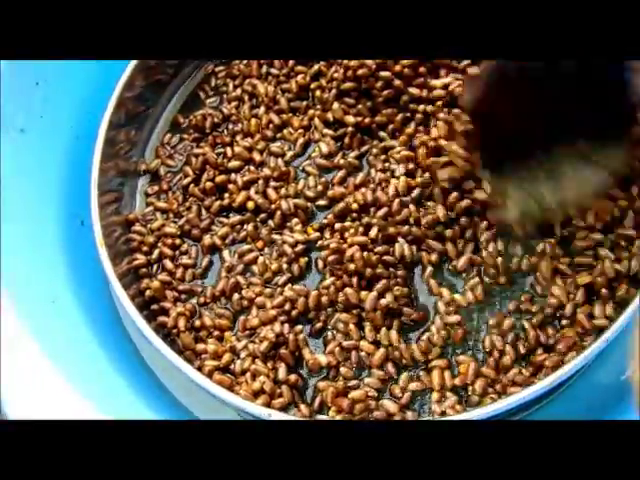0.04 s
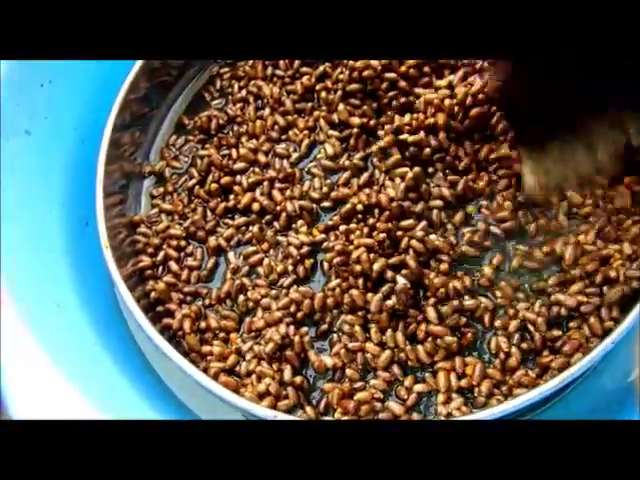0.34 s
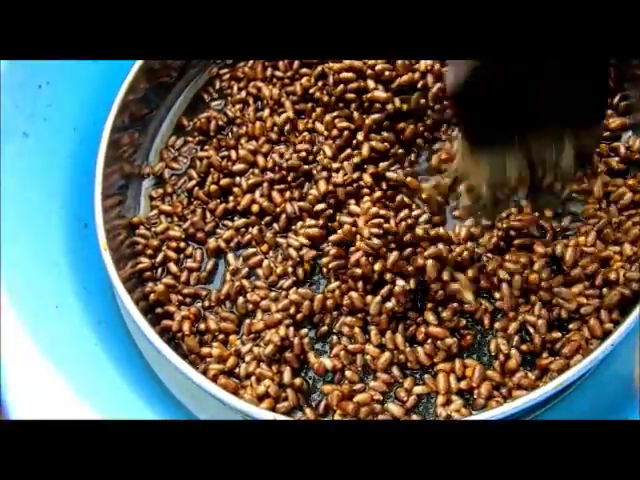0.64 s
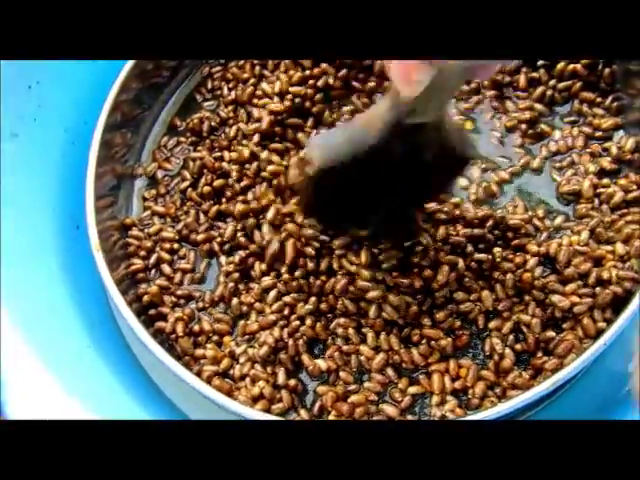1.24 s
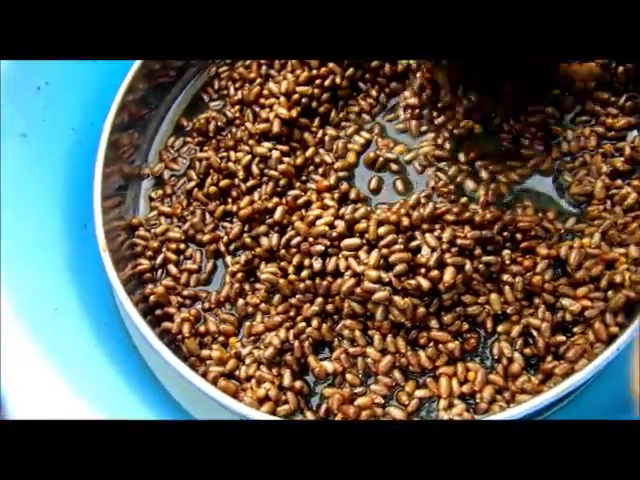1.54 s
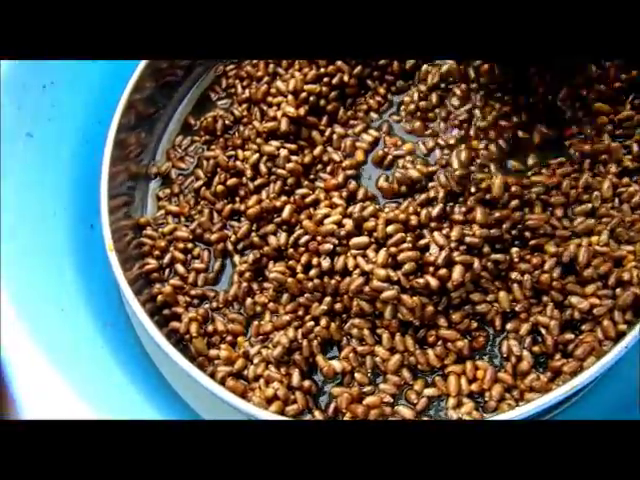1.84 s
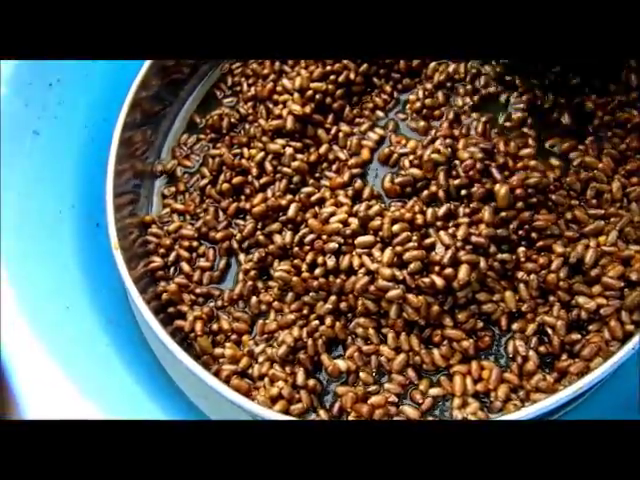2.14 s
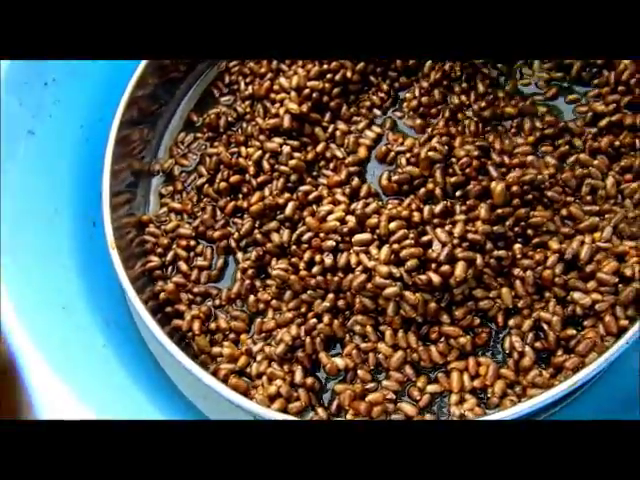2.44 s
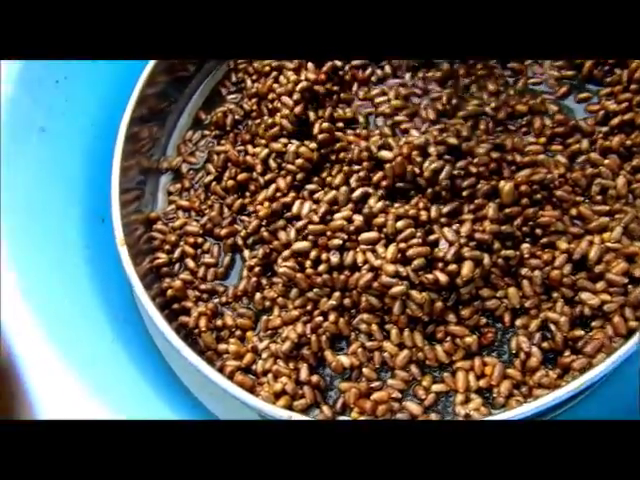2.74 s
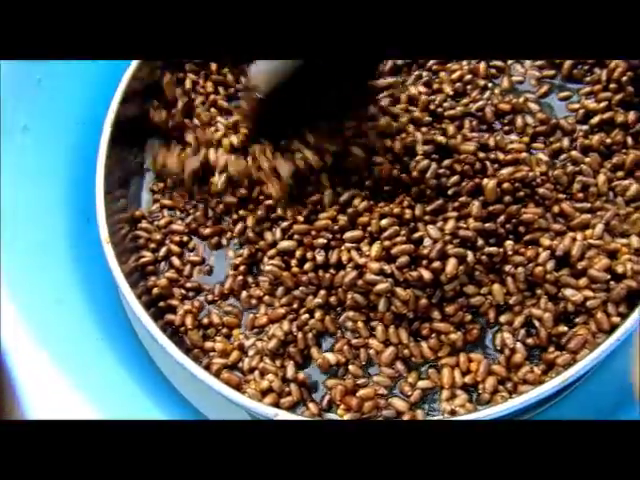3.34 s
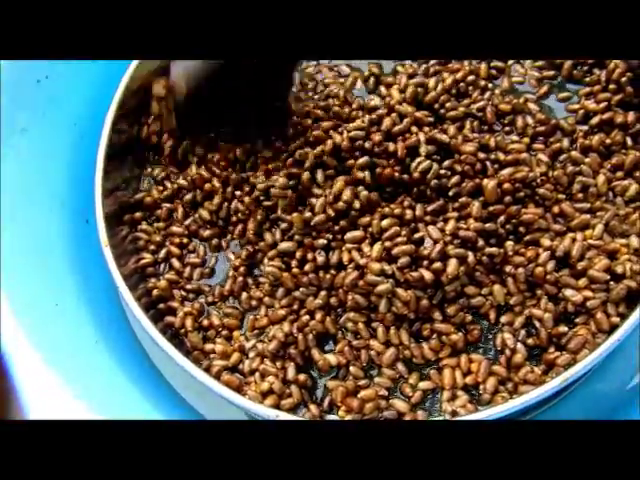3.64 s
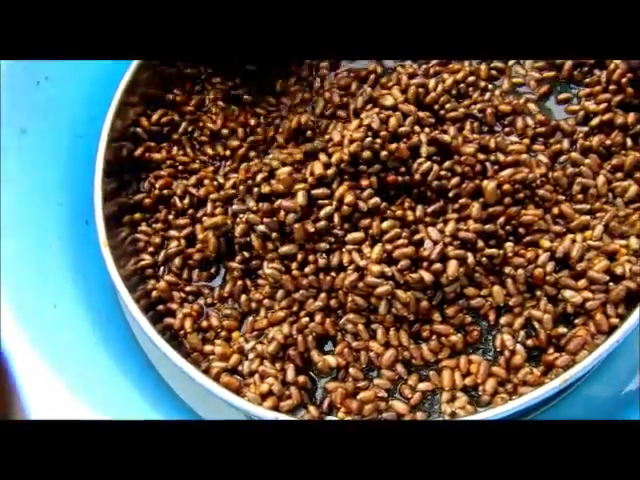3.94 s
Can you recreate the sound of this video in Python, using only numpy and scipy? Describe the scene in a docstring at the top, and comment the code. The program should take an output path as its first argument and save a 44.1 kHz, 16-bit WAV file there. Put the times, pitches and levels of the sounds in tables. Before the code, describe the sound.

Water swishes in uneven strokes as a paddle stirs light, crackling cocoons, close up.

```python
"""A paddle stirs small cocoons floating in a sieve of water, indoors, close to the microphone.
From the start, each stroke crowds wet contacts into a swish, frees little bubbles and makes the shells
crackle; air pockets plop and a few shells snap. Between strokes the water sloshes dully. Just past
two seconds comes a faint squeak, near three the basin is bumped, and the stirring goes on to the end.
Throughout, the resonances of the microphone's housing colour the sound."""
import sys
import numpy as np
from scipy import signal
from scipy.fft import rfft, irfft
from scipy.io import wavfile
from scipy.ndimage import uniform_filter1d

SR = 44100
rng = np.random.default_rng(int(sys.argv[2]) if len(sys.argv) > 2 else 0)


def master_out(mix):
    """Clip the mix to full scale and print it as 16-bit PCM to the path in sys.argv[1]."""
    frames = np.transpose(np.atleast_2d(mix))
    ceiling = np.clip(frames, -1, 1)
    pcm = np.round(ceiling * 32767).astype(np.int16)
    wavfile.write(sys.argv[1], SR, pcm)


N = 176400

BUBBLE_CUT_HZ, BUBBLE_HIGH_HZ = 410, 3010  # bubbles radiate no deep bass; pitch of the smallest
SNAP_DECAY_S = 0.00072


def undb(db):
    """Decibels as an amplitude ratio."""
    return 10 ** (np.asarray(db) / 20)


def unit(x):
    """Normalisation to rms 1."""
    return x / np.sqrt(np.mean(x ** 2))


def add(out, start_s, sound):
    """Superposition: a short sound adds to what is already there."""
    i = max(int(start_s * SR), 0)
    part = out[i:i + len(sound)]
    part += sound[:len(part)]


def cut(x, hz, kind, order):
    """High-pass or low-pass filtering, 6 dB per octave for each order."""
    return signal.sosfilt(signal.butter(order, hz, kind, fs=SR, output="sos"), x)


def colour(x, points):
    """Minimum-phase filtering through (frequency_hz, level_db) points; rms 1."""
    hz, db = np.array(points, float).T
    bins_hz = np.maximum(np.fft.rfftfreq(N, 1 / SR), 1)
    gain = undb(np.interp(np.log(bins_hz), np.log(hz), db))
    cepstrum = irfft(np.log(gain), N)
    cepstrum[1:N // 2] *= 2  # folding onto positive time makes the filter causal
    cepstrum[N // 2 + 1:] = 0
    return unit(irfft(rfft(x) * np.exp(rfft(cepstrum)), N))


def walk(rate_hz):
    """Random modulation: noise smoothed over 1 / rate_hz seconds; rms 1."""
    span = max(int(SR / rate_hz), 1)
    return unit(uniform_filter1d(uniform_filter1d(rng.standard_normal(N), span), span))


def contacts(per_s, scatter_db):
    """Shot noise: independent tiny impacts of uneven strength."""
    hit = rng.random(N) < per_s / SR
    polarity = np.sign(rng.standard_normal(N))
    return hit * polarity * undb(scatter_db * np.clip(rng.standard_normal(N), -2, 2))


def ring(hz, decay_s, attack_s, glide=0):
    """Damped oscillation; the pitch rises by the fraction glide in each decay time."""
    t = np.arange(int(10 * decay_s * SR) + 2) / SR
    phase = 2 * np.pi * hz * t * (1 + glide * t / decay_s / 2)
    return np.sin(phase) * np.exp(-t / decay_s) * (1 - np.exp(-t / attack_s))


def crack(top_hz):
    """A broadband transient: low-passed noise that quickly builds and fades."""
    age = np.arange(SR // 20) / SR / SNAP_DECAY_S
    return cut(rng.standard_normal(len(age)) * age * np.exp(-age), top_hz, "low", order=2)


def grains(per_s, low_hz, high_hz, decay_cycles, scatter_db, glide=0):
    """Incoherent sum of short rings of random pitch and strength; rms 1."""
    out, chance, pitch = np.zeros(N), rng.random(N), rng.random(N)
    strength = undb(scatter_db * np.clip(rng.standard_normal(N), -2, 2))
    for i in np.flatnonzero(chance < per_s / SR):
        hz = low_hz * (high_hz / low_hz) ** pitch[i]
        add(out, i / SR, strength[i] * ring(hz, decay_cycles / hz, 1 / hz, glide))
    return unit(cut(out, BUBBLE_CUT_HZ, "high", order=2))


def hiss():
    """The noise floor: faint, stationary coloured noise."""
    # spectral density of the hiss: frequency_hz, relative_db
    spectrum = [(30, -3), (200, 10), (1500, -3), (5000, -32), (10000, -7.5), (14500, -2.5), (16000, -15)]
    return undb(-65) * colour(rng.standard_normal(N), spectrum)


def room(direct, t60_s):
    """Reverberation: dense reflections decay exponentially, by 60 dB in t60_s."""
    t = np.arange(SR // 2) / SR
    tail = rng.standard_normal(len(t)) * np.exp(-np.log(1000) * t / t60_s)
    return signal.fftconvolve(direct, tail / np.linalg.norm(tail))[:N]


def high_hiss(slosh):
    """Amplitude-modulated noise: a faint high hiss that rises and falls with the sloshing."""
    return slosh * undb(-25.5) * cut(rng.standard_normal(N), 6500, "high", order=1)


def squeak():
    """A falling glide: one thin tone, perhaps of squeezed air, swells and fades."""
    # the whistle: start_s, length_s, first_hz, last_hz, level_db
    whistle = (2.16, .034, 2950, 2450, -52)
    start_s, length_s, first_hz, last_hz, level_db = whistle
    out, hz = np.zeros(N), np.linspace(first_hz, last_hz, int(length_s * SR))
    tone = np.sin(2 * np.pi * np.cumsum(hz) / SR)
    add(out, start_s, undb(level_db) * tone * np.sqrt(np.hanning(len(hz))))
    return out


def bump(start_s):
    """Modal vibration: a soft knock rings the low modes of the full basin."""
    # modes of the basin: pitch_hz, level_db, decay_ms
    modes = [(238, 2.5, 1.6), (337, -11.5, 10.3), (363, -15.5, 6.8), (550, -4, 0.72)]
    out = np.zeros(N)
    for pitch_hz, level_db, decay_ms in modes:
        add(out, start_s, -undb(level_db) * ring(pitch_hz, decay_ms / 1000, attack_s=.0013))
    return out


def snaps():
    """Impulse response of single shells and droplets: a crack and a tiny ring."""
    # snaps near the microphone: start_s, pitch_hz, ring_db, crack_db
    impacts = [(.031, 2420, -16.5, -21), (0.0817, 7850, -20.5, -39), (0.0994, 2740, -18, -25),
               (0.1616, 4600, -25, -22), (0.175, 4550, -27, -16), (0.1933, 6400, -19, -31),
               (0.2396, 2710, -17, -19), (.44, 4500, -26, -29), (0.5088, 4250, -26, -33),
               (.544, 4560, -26, -15.5), (0.6002, 4730, -22, -27), (0.659, 7400, -28, -25),
               (0.6876, 4380, -23.5, -38), (.9175, 2600, -4.5, -21), (0.9349, 6340, -31, -18.5),
               (1.113, 4540, -23.5, -34.5), (1.705, 14600, -16, -18), (1.7055, 4850, -14, -31),
               (1.7303, 7900, -17, -14.5), (1.895, 4530, -39, -29), (2.029, 4600, -20, -16.5),
               (2.075, 2300, -6.5, -20), (2.1614, 6200, -29.5, -36), (2.363, 7900, -35, -31),
               (2.6148, 4280, -20, -28), (2.717, 6370, -34, -14), (2.7785, 6250, -35, -19.5),
               (3.03, 2770, -8.5, -23), (3.048, 7800, -23, -16.5), (3.0601, 4500, -27, -22.5),
               (3.131, 6170, -30, -28), (3.169, 6100, -28, -41), (3.425, 3500, -15, -34),
               (3.5465, 4610, -18.5, -33)]
    out = np.zeros(N)
    for start_s, pitch_hz, ring_db, crack_db in impacts:
        add(out, start_s, undb(ring_db) * ring(pitch_hz, SNAP_DECAY_S, attack_s=2 / pitch_hz))
        add(out, start_s, undb(crack_db) * crack(top_hz=10000))
    return out


def plops():
    """Cavity resonance: an air pocket's film bursts with a click and the air rings a hollow note."""
    # larger air pockets: start_s, pitch_hz, level_db, decay_ms
    pockets = [(.045, 766, -22.5, 5.1), (0.2474, 846, -8.5, 1.8), (0.2506, 1069, -13.5, 6.6),
               (.5701, 766, -3, 1.07), (.814, 996, -20.5, 3.7), (.8828, 670, -9, 1), (.8885, 930, -9, 0.9),
               (1.3035, 660, -23, 3.1), (1.433, 720, -25.5, 4.5), (1.5265, 960, -22.5, 1.7),
               (1.946, 685, -24, 2.1), (2.137, 964, -26.5, 3.5), (2.205, 705, -24.5, 1.4),
               (2.377, 750, -16.5, 1.2), (2.882, 680, -26, 1.3), (2.9222, 825, -10, 1.55),
               (3.245, 900, -20, 1.8), (3.547, 576, -24.5, 2.5), (3.641, 665, -19.5, 2.5),
               (3.924, 1000, -23.5, 2.9)]
    out = np.zeros(N)
    for start_s, pitch_hz, level_db, decay_ms in pockets:
        film = undb(level_db - 21) * crack(BUBBLE_HIGH_HZ)
        note = -undb(level_db) * ring(pitch_hz, decay_ms / 1000, attack_s=0.00033, glide=0.0074)
        add(out, start_s, film)
        add(out, start_s, note)
    return cut(out, BUBBLE_CUT_HZ, "high", order=3)


def shells():
    """Stick-slip friction: cocoons catch and slip, rub in little clumps and tick against each other."""
    # spectral density of the rubbing: frequency_hz, relative_db
    spectrum = [(300, -15), (1500, 7), (2700, 11.5), (3600, -11), (4600, 8), (6000, 5), (9000, 1.5),
                (12000, -11.5), (16000, -12)]
    clumps = undb(5 * np.clip(walk(rate_hz=310), -2, 2))
    rustle = colour(contacts(per_s=5500, scatter_db=4.5) * clumps, spectrum)
    ticks = grains(per_s=450, low_hz=1890, high_hz=10500, decay_cycles=1.5, scatter_db=7)
    catching = unit(undb(3 * walk(rate_hz=66)))
    return (undb(0.5) * rustle + ticks) * catching


def water():
    """Wet contacts merge into gurgling shot noise, in which small bubbles ring at resonance."""
    # spectral density of the swish: frequency_hz, relative_db
    spectrum = [(40, -15), (110, -34.5), (190, -20), (290, -2.5), (550, 1.5), (850, -1), (1500, 2.5),
                (2100, -8), (2900, -6.5), (3600, -18), (4600, -17.5), (6000, -25), (10000, -30),
                (16000, -42)]
    wet_contacts = contacts(per_s=9000, scatter_db=3)
    gurgle = undb(1.8 * walk(rate_hz=130))
    swish = colour(wet_contacts * gurgle, spectrum)
    bubbles = grains(per_s=240, low_hz=596.7, high_hz=BUBBLE_HIGH_HZ,
                     decay_cycles=4.3, scatter_db=4, glide=0.036)
    return undb(-2.5) * swish + undb(-8) * bubbles


def paddle():
    """Amplitude envelopes of slosh, swish and crackle; overlapping strokes add in power."""
    # motion that goes on between strokes: time_s, slosh_db, crackle_db
    idle_motion = [(0, -39.5, -53.5), (.4, -38.5, -73), (.75, -37.5, -48.5), (1.3, -40.5, -50),
                   (1.5, -43.5, -62.5), (1.91, -43.5, -67), (2.2, -48.5, -62), (2.44, -42.5, -72),
                   (2.76, -40, -70), (2.81, -51.5, -79), (2.97, -52.5, -54.5), (3.3, -48.5, -56.5),
                   (3.5, -43, -58), (4, -39, -55.5)]
    # strokes of the paddle: peak_s, rise_s, fall_s, swish_db, crackle_db
    strokes = [(.06, 0.042, 0.1, -38.5, -45), (.185, 0.026, 0.047, -33.5, -43),
               (.275, 0.026, 0.065, -39.5, -47.5), (.45, 0.057, 0.051, -40, -45.5),
               (.56, 0.089, 0.087, -32, -43), (.82, 0.047, 0.047, -32, -49),
               (.915, 0.074, 0.0074, -36, -48), (1.014, 0.039, 0.028, -30, -50),
               (1.11, 0.029, 0.012, -31.5, -62), (1.195, 0.024, 0.039, -27.5, -68),
               (1.346, 0.026, 0.036, -25.5, -47), (1.624, 0.037, 0.014, -34, -53),
               (1.739, 0.049, 0.043, -28, -47.5), (1.962, 0.011, 0.022, -39, -45),
               (2.055, 0.024, 0.034, -25, -44), (2.3, 0.024, 0.059, -39.5, -49.5),
               (2.363, 0.04, 0.014, -32.5, -63), (2.556, 0.05, 0.012, -37.5, -51.5),
               (2.693, 0.052, 0.037, -25.5, -40), (2.898, 0.0083, 0.02, -43, -52),
               (3.052, 0.038, 0.061, -32.5, -56), (3.257, 0.012, 0.013, -35.5, -49.5),
               (3.417, 0.042, 0.057, -29, -50), (3.545, 0.016, 0.008, -32, -68),
               (3.645, 0.057, 0.061, -34.5, -71), (3.761, 0.024, 0.035, -29.5, -47),
               (3.813, 0.013, 0.034, -28, -43), (3.95, 0.056, 0.11, -41.5, -62)]
    shape = 1.68  # 1 = pointed swell, 2 = round
    crackle_width = 0.98  # duration relative to the swish
    t = np.arange(N) / SR
    time_s, *idle_db = np.array(idle_motion).T
    slosh, idle_crackle = (undb(np.interp(t, time_s, db)) for db in idle_db)
    swish_power, crackle_power = 0, idle_crackle ** 2
    for peak_s, rise_s, fall_s, swish_db, crackle_db in strokes:
        away = np.abs(t - peak_s) / np.where(t < peak_s, rise_s, fall_s)
        swish_power += np.exp(-away ** shape) * undb(swish_db) ** 2
        crackle_power += np.exp(-(away / crackle_width) ** shape) * undb(crackle_db) ** 2
    return slosh, np.sqrt(swish_power), np.sqrt(crackle_power)


def scene():
    """Superposition of the stirring, its reverberation in a small room, the bump and the hiss."""
    slosh, swish, crackle = paddle()
    settling = slosh * cut(water(), 1770, "low", order=2)  # water left to itself sounds dull
    direct = settling + high_hiss(slosh) + swish * water() + crackle * shells()
    direct += plops() + snaps() + squeak()
    reflections = undb(-18) * room(direct, t60_s=0.096)
    return (direct + reflections + bump(start_s=2.7811) + hiss())[None]


def record(dry):
    """Resonance and antiresonance: the housing of a band-limited microphone lifts and cancels pitches."""
    # resonances of the housing: centre_hz, width_hz, gain_db
    resonances = [(672.7, 108, 7.5), (1038, 56, 7), (4440, 416, 9)]
    # its antiresonances: centre_hz
    null_centres = [3190, 4075, 5130, 5680, 7125, 8190]
    # their bandwidths: width_hz
    null_widths = [248, 262, 553, 426, 239, 50]
    x = cut(dry, 79, "high", order=3)  # the microphone drops the deepest bass
    for centre_hz, width_hz, gain_db in resonances:
        band = signal.lfilter(*signal.iirpeak(centre_hz, centre_hz / width_hz, SR), x)
        x = x + (undb(gain_db) - 1) * band
    for centre_hz, width_hz in zip(null_centres, null_widths):
        x = signal.lfilter(*signal.iirnotch(centre_hz, centre_hz / width_hz, SR), x)
    treble_cut = signal.ellip(10, .2, 80, 15900, fs=SR, output="sos")
    return signal.sosfilt(treble_cut, x)


dry = scene()
out = record(dry)
master_out(out)
```